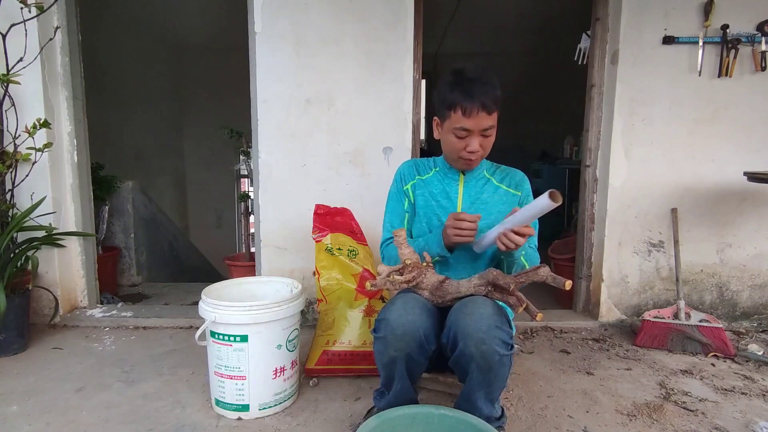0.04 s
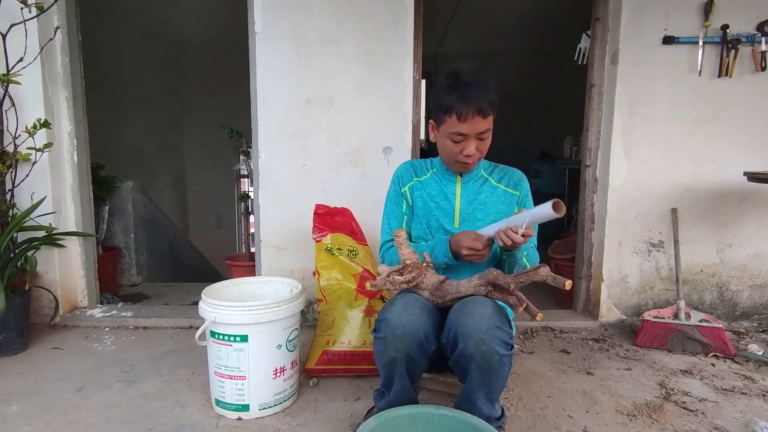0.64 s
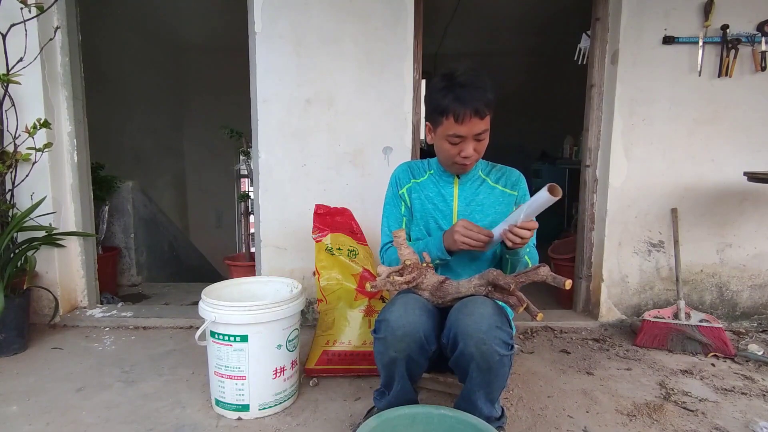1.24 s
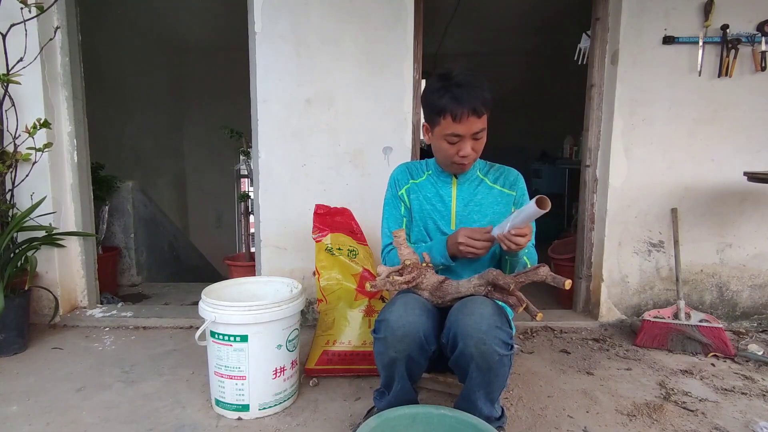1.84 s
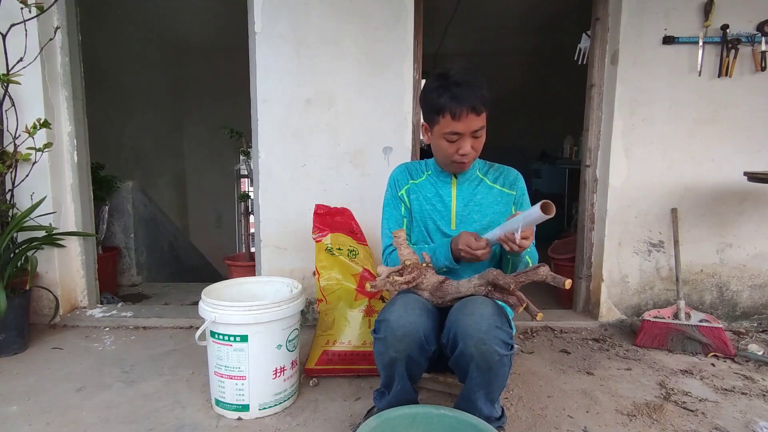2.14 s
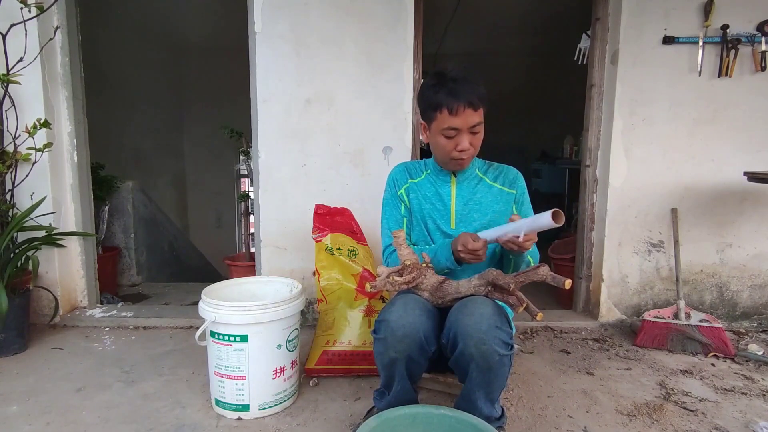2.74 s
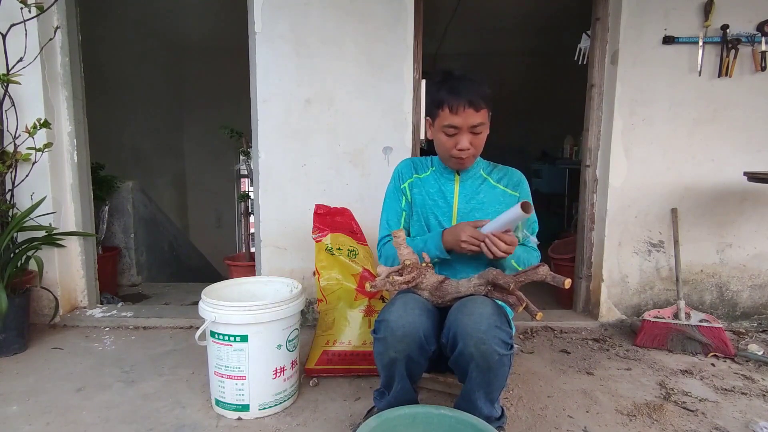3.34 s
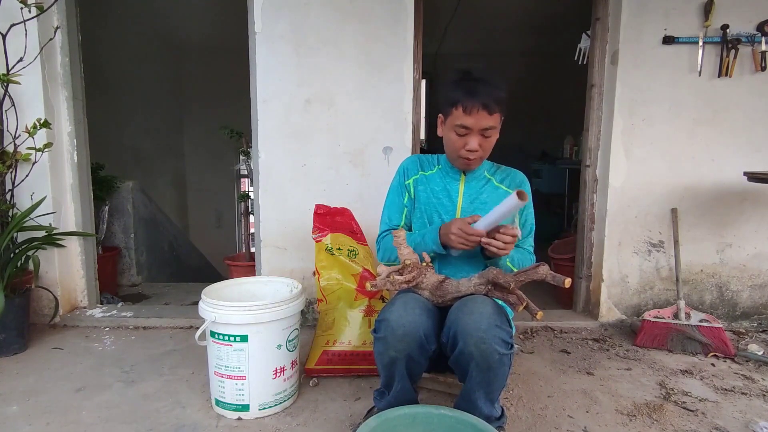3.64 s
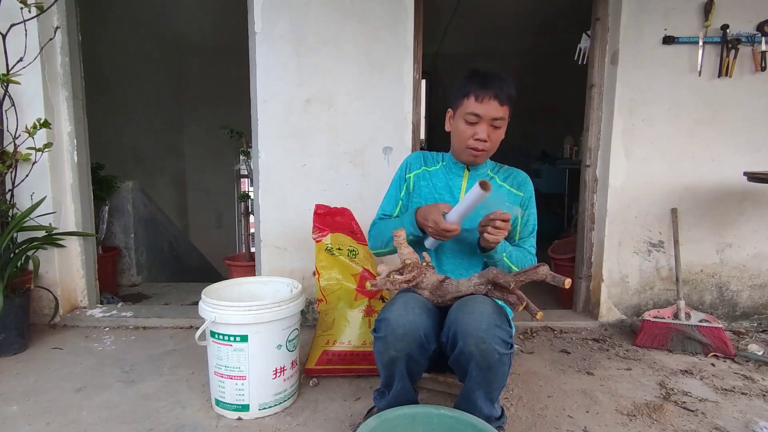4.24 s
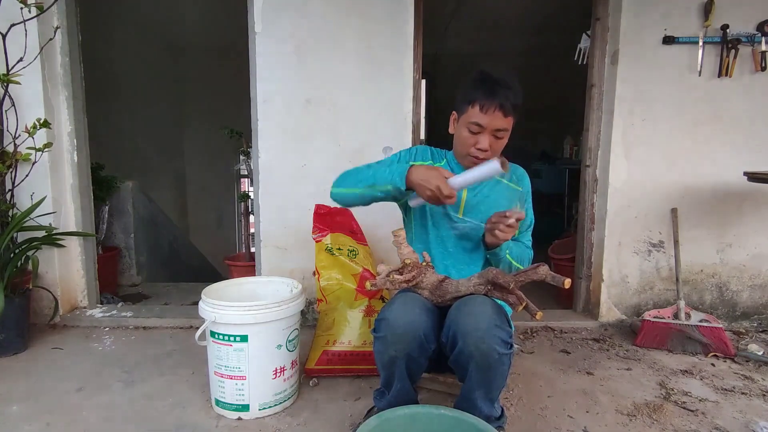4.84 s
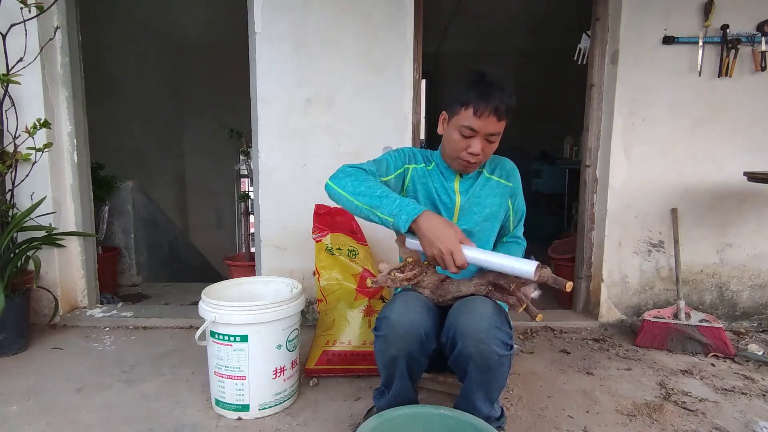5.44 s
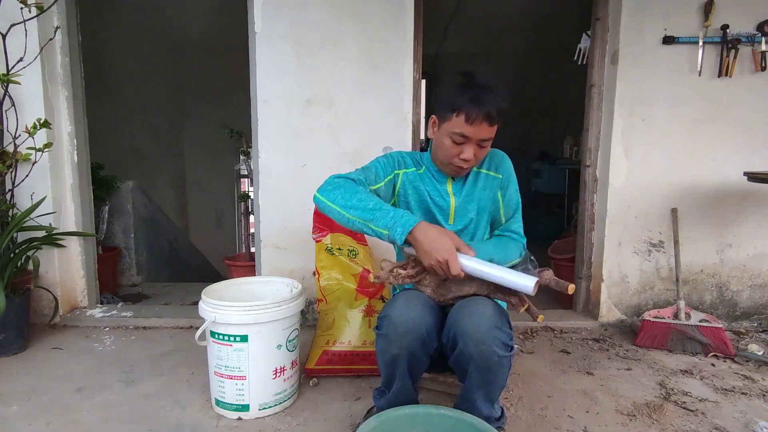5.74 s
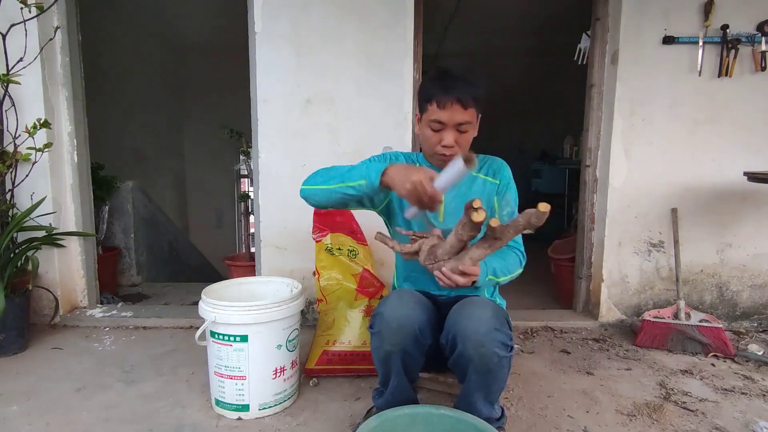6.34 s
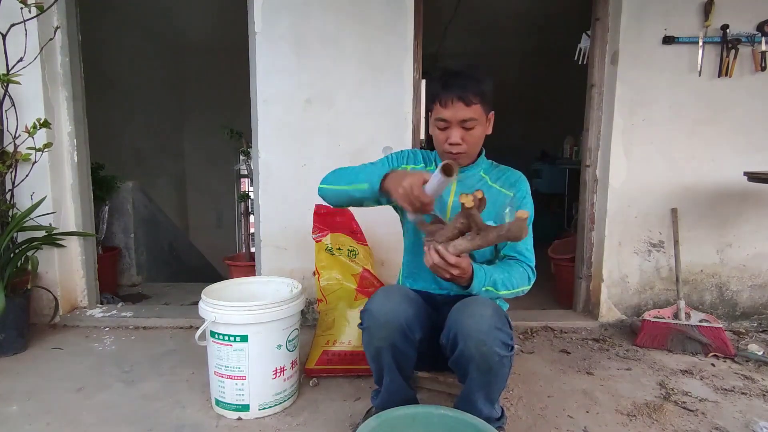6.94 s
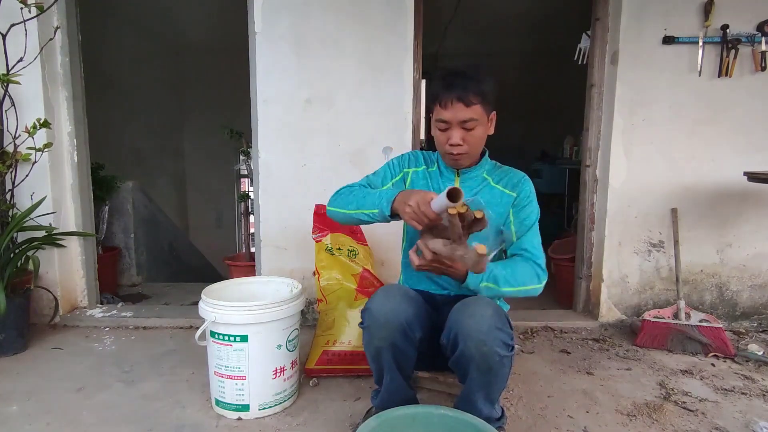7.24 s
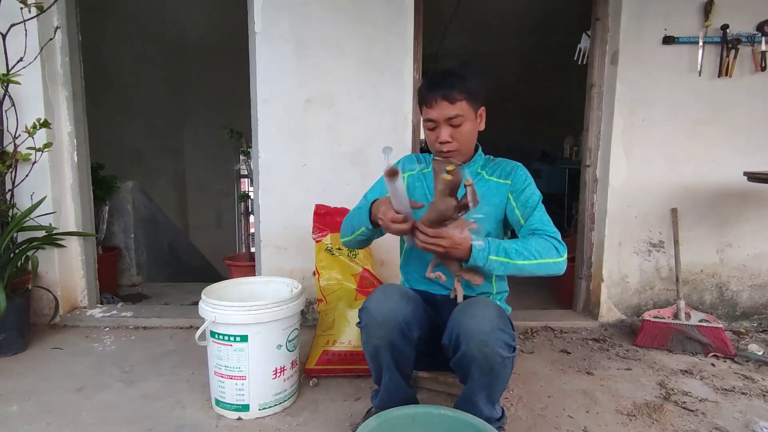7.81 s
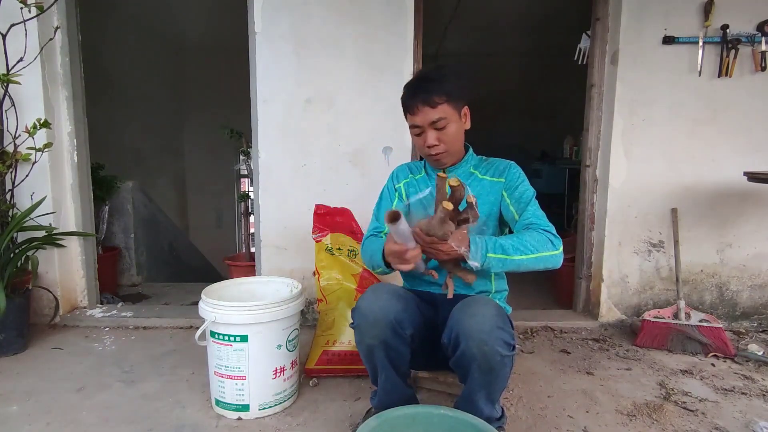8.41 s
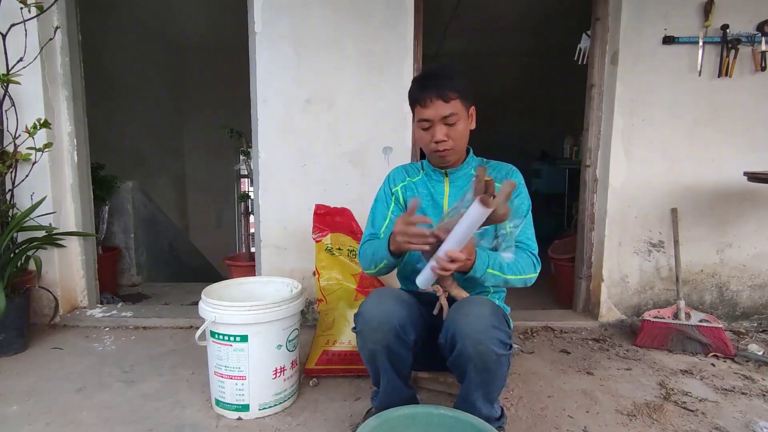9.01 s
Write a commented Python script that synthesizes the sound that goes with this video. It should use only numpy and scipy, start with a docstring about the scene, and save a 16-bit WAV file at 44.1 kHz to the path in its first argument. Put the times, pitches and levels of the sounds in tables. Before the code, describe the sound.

Fingers pick at a roll of cling film with soft, scattered ticks and crinkles. About halfway through, the film is pulled open in three quick tugs, each with a high squeal. Louder crackling and snapping follow as it is wound around a piece of tree trunk, with hands rubbing on bark and a few light wooden knocks. Faint birds and a low outdoor rumble lie behind, and a house wall adds a short echo.

```python
"""Before a doorway, outdoors: someone picks at a roll of cling film, pulls it open in three tugs
and winds it round a piece of tree trunk. The film squeals as it sticks and slips off the roll;
its creases crinkle and snap. Hands and sleeves rub on bark, the wood knocks. The house wall throws
a short echo; behind it all lie faint birds, a brief thin ringing and a low outdoor rumble."""
import sys
import numpy as np
from scipy import signal
from scipy.fft import rfft, irfft, next_fast_len
from scipy.io import wavfile
from scipy.ndimage import map_coordinates

SR = 44100
rng = np.random.default_rng(int(sys.argv[2]) if len(sys.argv) > 2 else 0)


def wrap_up_sound(samples):
    """Save the sound to the file named by the first command line argument, as 16-bit audio."""
    columns = np.atleast_2d(samples).T
    # keep every value between -1 and 1, then stretch to whole-number steps
    tamed = np.clip(columns, -1, 1)
    steps = np.round(tamed * 32767).astype(np.int16)
    wavfile.write(sys.argv[1], SR, steps)


N = 404397
TIME_S = np.arange(N) / SR
BINS_HZ = np.fft.rfftfreq(N, 1 / SR)


# Taut film spectrum: freq_hz, gain_db
TAUT_FILM = [(1500, -30.5), (3100, -16.5), (4700, -11.5), (6300, -1.5), (7400, 1.5), (9500, -3),
             (11500, -10.5), (14500, -20.5), (15600, -18)]
# Strands letting go: start_s, length_s, level_db, first_hz, middle_hz, last_hz, crest_frac, tear_frac
SQUEALS = [(4.5625, .018, -11.5, 6800, 6610, 6440, 0.23, 0.1),
           (4.57, 0.036, -18, 6470, 5890, 5950, 0.13, 0.72),
           (4.572, .022, -19, 1896, 2690, 3330, 0.5, 0.36),
           (4.844, 0.07, -18, 8440, 6830, 6400, 0.72, .015),
           (4.858, 0.023, -18.5, 7780, 7160, 7000, 0.2, 0), (4.911, 0.023, -16.5, 6470, 6840, 7700, 0, 0),
           (4.914, .036, -15.5, 7900, 8640, 9740, 0.22, .02),
           (4.944, 0.0227, -25, 9500, 11530, 15900, 0.05, 0.06),
           (5.195, 0.042, -25, 2640, 3000, 3050, 0.5, 0.63), (5.226, .058, -18, 3025, 3190, 3530, 0.4, 0.1),
           (5.27, .02, -17, 7450, 8600, 9700, 0.26, 0.05), (5.258, .046, -24, 4330, 4710, 4890, 0.5, 0.12),
           (5.273, .046, -22, 3490, 3630, 3660, .22, 0.88), (5.315, .022, -23, 7200, 8120, 9960, 0.3, 0.47),
           (6.028, .014, -33.5, 5760, 6480, 7000, .3, 0.2),
           (8.557, 0.033, -33.5, 3244, 3380, 3410, 0.74, .4),
           (8.578, 0.014, -32.5, 5040, 5250, 5500, 0.2, .1)]

def squeal(length_s, level_db, first_hz, middle_hz, last_hz, crest_frac, tear_frac):
    """Film sticks and slips off the roll: even slips give a tone, uneven ones a tearing hiss."""
    grab_db, release_db, edge_s = -9, -12, 0.0013
    overtone_db_per_oct, body_db = -3, -24
    t = np.arange(0, length_s, 1 / SR)
    progress = t / length_s
    # Slip rate follows pull speed in one smooth bend.
    bend = np.polyfit([0, .5, 1], np.log([first_hz, middle_hz, last_hz]), 2)
    slip_hz = np.exp(np.polyval(bend, progress))
    jitter = np.interp(tear_frac, [0, 1], [0.016, 0.093])
    cycles = np.cumsum(slip_hz * (1 + jitter * wobble(len(t), rate_hz=1110))) / SR
    harmonic = np.arange(1, 7)[:, None]
    weight = gain(at_hz(TAUT_FILM, harmonic * slip_hz) + overtone_db_per_oct * np.log2(harmonic))
    weight *= harmonic * slip_hz < SR / 2
    tone = (weight * np.cos(2 * np.pi * harmonic * cycles)).sum(0)
    tone /= np.sqrt((weight ** 2).sum(0) / 2 + 1e-20)
    rips = clicks(len(t), per_s=16000, spread_db=3)
    hiss = colour(rips, TAUT_FILM) + gain(body_db) * colour(rips, RUB_SPECTRUM)
    swell = gain(level_db + np.interp(progress, [0, crest_frac, 1], [grab_db, 0, release_db]))
    swell *= np.minimum(np.minimum(t, length_s - t) / edge_s, 1)
    swell *= flutter(len(t), depth_db=-0.5, rate_hz=260)
    return swell * (np.sqrt(1 - tear_frac) * tone + np.sqrt(tear_frac) * hiss)


# Loose film spectrum: freq_hz, density_db
LOOSE_FILM = [(900, -21), (2000, -12.5), (3000, -9), (5000, -3), (6300, 1.5), (7400, 6), (8800, -1.5),
              (10300, -3), (12000, -11.5), (14500, -12), (15600, -24.5)]
# Hand activity on the film: time_s, level_db
HAND_EFFORT = [(0, -73), (.9, -72), (1.04, -65), (1.2, -74.5), (1.88, -68), (2.1, -56.5), (2.42, -74),
               (2.75, -57), (3.03, -70), (3.5, -59.5), (4.3, -60), (4.5, -63), (5.75, -57), (6.4, -51),
               (6.85, -48), (7.2, -55), (7.6, -49.5), (7.9, -64), (8.15, -62), (8.95, -62), (9.17, -68)]

def crinkle(half_merged_db=-41, stray_db=-9):
    """Loose film ticks in clumps, with stray louder creases; faster motion merges the ticks to hiss."""
    effort = envelope(HAND_EFFORT) * flutter(N, depth_db=-1, rate_hz=11.4)
    merged = effort / (effort + gain(half_merged_db))
    sparse = np.sqrt(1 - merged) * clicks(N, per_s=1500, spread_db=7.5)
    dense = np.sqrt(merged) * clicks(N, per_s=12000, spread_db=6)
    clumps = flutter(N, depth_db=2, rate_hz=70.5)
    strays = gain(stray_db) * clicks(N, per_s=10, spread_db=4.5)
    return colour(effort * (clumps * (sparse + dense) + strays), LOOSE_FILM)


# Single creases: start_s, strength_db, shiver_re_click_db, body_re_treble_db
SNAPS = [(.7127, -17.5, -18, -17), (1.5259, -25.5, -26, -23), (1.7818, -15, -15, -10),
         (2.0473, -26.5, -24, -6), (2.2393, -20.5, -26, -19), (2.3569, -18.5, -14, -3.5),
         (2.6672, -18, -20, -7.5), (2.9625, -23.5, -8, -6), (3.1932, -21.5, -19, -20),
         (3.483, -16.5, -16, -13), (3.552, -18.5, 4, -6), (4.0037, -32, -20, 7.5), (4.575, -3, -30, -24),
         (5.8503, -23, -26, 2), (5.879, -22, -16, -1), (6.244, -1.5, -18, -19), (6.276, -3.5, -10, -22),
         (6.4785, -3.5, -21, -5.5), (6.4936, -5, -25, -5), (6.666, -13, -10, -16), (6.721, -13.5, -18, -25),
         (6.933, -16, -14, -24), (6.9672, -17, -10, -4.5), (7.152, -2.5, -14, -31),
         (7.1557, -8.5, -20, 0.5), (7.3986, -22, -17, -6), (7.637, -16, -16, -4.5), (8.33, -24, -15, -8)]

def snaps(trim_db=2, shiver_s=0.0032):
    """A crease clicks through and the sheet shivers; what lies under it adds a duller body."""
    treble, body = np.zeros((2, N))
    t = np.arange(SR // 20) / SR
    for start_s, strength_db, shiver_db, body_db in SNAPS:
        shiver = gain(shiver_db) * np.exp(-t / shiver_s) * rng.standard_normal(len(t))
        snap = (t == 0) + shiver
        snap *= gain(strength_db + trim_db) / np.linalg.norm(snap)
        add(treble, start_s, snap)
        add(body, start_s, gain(body_db) * snap)
    return colour(treble, LOOSE_FILM) + colour(body, RUB_SPECTRUM)


# Runs of creases: crest_s, level_db, decay_s, body_re_treble_db
CRUMPLES = [(0.71, -46.5, 0.015, -6), (1.585, -48, 0.029, -2.5), (1.676, -44, 0.017, 0),
            (1.799, -52, 0.0092, 5.5), (2.615, -47, 0.037, -8.5), (2.97, -46, 0.013, -1.5),
            (3.199, -55, 0.048, -11), (3.519, -52, 0.034, -9), (3.811, -51.5, 0.031, -1),
            (4.238, -50.5, 0.092, -9.5), (6.11, -43.5, 0.055, -6), (6.351, -31, 0.043, -14.5),
            (6.442, -32.5, 0.03, -4.5), (6.481, -33.5, .018, -3), (6.75, -39, 0.031, -8.5),
            (6.815, -39.5, 0.03, -10), (7.034, -31.5, 0.018, -9.5), (7.417, -43, .018, -6),
            (7.498, -32, 0.012, -9), (7.644, -40.5, .011, -21), (8.121, -60, .04, 2.5),
            (8.347, -54, 0.013, 2), (8.579, -34.5, 0.0088, -12), (8.664, -48.5, 0.01, -15),
            (8.865, -47.5, 0.012, 1), (8.949, -56.5, .04, -2)]

def crumples(rise_per_decay=1.1):
    """Bunched or stretched film creases in quick runs, bright from the film and dull from beneath."""
    treble, body = np.zeros((2, N))
    t = np.arange(-SR // 6, SR // 4) / SR
    for crest_s, level_db, decay_s, body_db in CRUMPLES:
        swell = np.exp(-np.where(t < 0, (t / (rise_per_decay * decay_s)) ** 2, t / decay_s))
        clumps = flutter(len(t), depth_db=2, rate_hz=200)
        run = gain(level_db) * swell * clumps * clicks(len(t), per_s=8000, spread_db=3.5)
        add(treble, crest_s + t[0], run)
        add(body, crest_s + t[0], gain(body_db) * run)
    return colour(treble, LOOSE_FILM) + colour(body, RUB_SPECTRUM)


# Friction on bark: freq_hz, density_db
RUB_SPECTRUM = [(150, -19.5), (320, -5.5), (520, 4.5), (750, 1), (1200, -1.5), (2300, -0.5), (4500, -0.5),
                (9000, -11)]
# Sliding effort: time_s, level_db
RUB_EFFORT = [(3.6, -63), (5, -62), (5.65, -57.5), (6.14, -56.5), (6.72, -52.5), (7.16, -71), (7.6, -51),
              (7.9, -61.5), (9.17, -57.5)]

def bark_rub(trim_db=-2):
    """Skin, cloth and film catch on rough bark in dense, dull ticks."""
    clumps = flutter(N, depth_db=2, rate_hz=49.8)
    catches = clicks(N, per_s=5000, spread_db=5.5)
    return gain(trim_db) * colour(envelope(RUB_EFFORT) * clumps * catches, RUB_SPECTRUM)


# Trunk modes: pitch_hz, level_db, t60_s
WOOD_MODES = [(381, -16, 0.031), (450, -2, .045), (516, 3.5, 0.07), (570, -3, 0.033), (1190, -7, 0.0093),
              (1430, -8, 0.024), (1630, -9.5, 0.026), (1915, -4.5, 0.021), (2150, -7, 0.023)]
# Bumps of trunk and cardboard roll: start_s, strength_db, upper_modes_db
KNOCKS = [(1.58, -59, 23), (1.667, -44, -4), (1.784, -43, 5), (3.552, -56, 23.5), (5.668, -53.5, 26.5),
          (6.481, -46, 30.5), (7.153, -33.5, -7), (8.854, -27.5, 0.5)]

def wood_knocks(upper_above_hz=1000, detune_frac=0.016):
    """Each bump rings the damped modes of the wood."""
    out, t = np.zeros(N), np.arange(SR // 5) / SR
    for start_s, strength_db, upper_db in KNOCKS:
        for pitch_hz, mode_db, t60_s in WOOD_MODES:
            decay = gain(mode_db + upper_db * (pitch_hz > upper_above_hz) - 60 * t / t60_s)
            mode = np.sin(2 * np.pi * pitch_hz * rng.normal(1, detune_frac) * t)
            add(out, start_s, gain(strength_db) * decay * mode / 2)
    return out


# Squeaks and bird calls: start_s, length_s, first_hz, last_hz, level_db
CHIRPS = [(1.832, .067, 6700, 5320, -62), (1.86, .12, 5000, 4860, -62), (1.968, .08, 4370, 4150, -64),
          (3.768, 0.033, 868, 747, -52), (7.739, 0.016, 1630, 1650, -50), (8.049, 0.22, 6760, 6480, -63.5),
          (8.246, 0.15, 4560, 4600, -68)]

def chirps():
    """Stray squeaks and far birds, each a short gliding whistle."""
    out = np.zeros(N)
    for start_s, length_s, first_hz, last_hz, level_db in CHIRPS:
        add(out, start_s, gain(level_db) * whistle(length_s, first_hz, last_hz, waver_frac=0.035))
    return out


# Partials of the ringing: pitch_hz, level_db
RING_PARTIALS = [(2470, -0.5), (2880, -5.5), (3420, -9)]
# Its swells: start_s, length_s, level_db
RING_SWELLS = [(7.445, .12, -50), (7.533, .22, -58), (7.749, 0.22, -65)]

def ringing():
    """A thin ringing of wavering partials in three fading swells."""
    out = np.zeros(N)
    for start_s, length_s, level_db in RING_SWELLS:
        for pitch_hz, partial_db in RING_PARTIALS:
            partial = whistle(length_s, pitch_hz, pitch_hz, waver_frac=0.021)
            add(out, start_s, gain(level_db + partial_db) * partial)
    return out


# Porch decay: freq_hz, t60_s
PORCH_DECAY = [(200, 0.17), (1000, 0.43), (3500, 0.4), (7000, 0.31), (15000, 0.26)]

def doorway_echo(x, early_db=-2, early_decay_s=0.013, tail_db=-10.5, cycle_hz=2.15):
    """Close reflections and a short porch tail, cycling steadily through three echo patterns."""
    count, out = SR // 2, np.zeros((2, N))
    t, shape = np.arange(count) / SR, (2, count)
    for pattern in range(3):
        taps = rng.standard_normal(shape) * (rng.random(shape) < .15) * (t > .008)
        freq_hz, frame_s, frames = signal.stft(taps, SR, nperseg=256)
        frames *= gain(-60 * frame_s / at_hz(PORCH_DECAY, freq_hz)[:, None])
        tail = signal.istft(frames, SR, nperseg=256)[1][:, :count]
        early = rng.choice([-1, 1], shape) * (rng.random(shape) < .05) * (t > .0005)
        early = early * np.exp(-t / early_decay_s)
        response = gain(early_db) * early / np.linalg.norm(early, axis=1, keepdims=True)
        response += gain(tail_db) * tail / np.linalg.norm(tail, axis=1, keepdims=True)
        # Constant-power crossfade keeps the echo's colour changing.
        share = np.cos(np.pi * (2 * cycle_hz * TIME_S + pattern / 3)) * np.sqrt(2 / 3)
        out += signal.oaconvolve((share * x)[None], response, axes=1)[:, :N]
    return out


# Outdoor background: freq_hz, density_db
AIR_SPECTRUM = [(12, -43), (20, -1), (118, -5), (160, -7.5), (229, -6), (270, -8), (328, -12), (421, -15.5),
                (484, -14.5), (540, -14.5), (818, -17), (3180, -28.5), (15000, -37)]
# Its slow swell: time_s, level_db
AIR_LEVEL = [(0, -58.5), (5.13, -54), (9.17, -57.5)]
# Its left-right likeness: freq_hz, correlation
AIR_CORRELATION = [(30, 0.68), (70, 0.91), (170, 0.92), (300, 0.78), (600, 0.24), (1500, 0)]

def outdoor_air(trim_db=3):
    """Low rumble and faint hiss, nearly alike on both sides in the bass."""
    left, independent = rfft(rng.standard_normal((2, N)))
    correlation = at_hz(AIR_CORRELATION, BINS_HZ)
    right = correlation * left + np.sqrt(1 - correlation ** 2) * independent
    noise = irfft(np.array([left, right]) * gain(at_hz(AIR_SPECTRUM, BINS_HZ)), N)
    return gain(trim_db) * envelope(AIR_LEVEL) * unit_rms(noise)


def gain(db):
    """Decibels to amplitude ratio."""
    return 10 ** (np.asarray(db) / 20)


def unit_rms(x):
    """Scales to rms 1."""
    return x / np.sqrt(np.mean(x ** 2) + 1e-20)


def at_hz(table, freq_hz):
    """Interpolates (freq_hz, value) rows on a log-frequency axis."""
    knots_hz, values = np.transpose(table)
    return np.interp(np.log(freq_hz + 1), np.log(knots_hz + 1), values)


def envelope(table):
    """Gain from (time_s, level_db) rows, silent before the first."""
    time_s, level_db = np.transpose(table)
    return gain(np.interp(TIME_S, time_s, level_db)) * (TIME_S >= time_s[0])


def add(mix, start_s, sound):
    """Mixes a sound in at start_s."""
    part = mix[max(round(start_s * SR), 0):][:len(sound)]
    part += sound[:len(part)]


def colour(x, spectrum, size=2048):
    """Minimum-phase filter of unit energy with the given spectrum."""
    log_gain = np.log(gain(at_hz(spectrum, abs(np.fft.fftfreq(size, 1 / SR)))))
    taps = np.fft.ifft(np.exp(np.conj(signal.hilbert(log_gain)))).real[:size // 2]
    return signal.oaconvolve(x, taps / np.linalg.norm(taps))[:len(x)]


def wobble(count, rate_hz):
    """Smooth noise rolling off at rate_hz, rms 1."""
    size = next_fast_len(count)
    lowpass = np.exp(-(np.fft.rfftfreq(size, 1 / SR) / rate_hz) ** 2)
    return unit_rms(irfft(rfft(rng.standard_normal(size)) * lowpass, size)[:count])


def flutter(count, depth_db, rate_hz):
    """Randomly wavering gain, rms 1."""
    return unit_rms(gain(depth_db * wobble(count, rate_hz)))


def clicks(count, per_s, spread_db):
    """Random impulses, many small and a few large, rms 1."""
    sizes = gain(spread_db * np.minimum(rng.exponential(1, count), 4))
    return unit_rms(sizes * rng.choice([-1, 1], count) * (rng.random(count) < per_s / SR))


def whistle(length_s, first_hz, last_hz, waver_frac):
    """Gliding, wavering sine with soft ends, rms 1."""
    count = int(length_s * SR)
    pitch_hz = np.linspace(first_hz, last_hz, count) * (1 + waver_frac * wobble(count, rate_hz=297))
    return unit_rms(np.sin(2 * np.pi * np.cumsum(pitch_hz) / SR) * signal.windows.tukey(count, .6))


# Hand position as arrival lag: time_s, right_lag_samples
HAND_LAG = [(4.2, 4.3), (4.56, 3), (6.3, 2.5), (7.3, 2.9), (8.5, 1)]

def scene(direct_db=-2):
    """Handling and chirps a little to the left, their echo, and the outdoor air."""
    left = crinkle() + bark_rub() + snaps() + crumples() + wood_knocks() + chirps() + ringing()
    for start_s, *strand in SQUEALS:
        add(left, start_s, squeal(*strand))
    lag_samples = np.interp(TIME_S, *np.transpose(HAND_LAG))
    right = map_coordinates(left, [np.arange(N) - lag_samples], order=5)
    return gain(direct_db) * np.array([left, right]) + doorway_echo(left) + outdoor_air()


# Microphone port imbalance: freq_hz, left_minus_right_db
PORT_TILT = [(300, 0), (3000, -.5), (5800, -1), (6700, -1.5), (7350, -6.5), (8300, 4), (9800, 4),
             (11800, -3.5), (14000, 2), (15500, -11)]

def record(dry, cutoff_hz=15550):
    """Two microphone ports resonate at different pitches; a steep low-pass follows."""
    tilt_db = at_hz(PORT_TILT, BINS_HZ) * np.array([[.5], [-.5]])
    ported = irfft(rfft(dry) * gain(tilt_db), N)
    lowpass = signal.firwin(511, cutoff_hz, window=("kaiser", 9), fs=SR)
    return signal.oaconvolve(ported, lowpass[None], "same")


dry = scene()
out = record(dry)
wrap_up_sound(out)
```